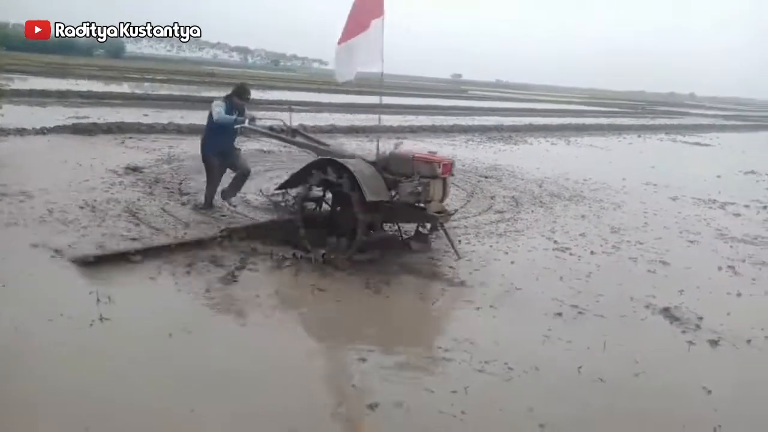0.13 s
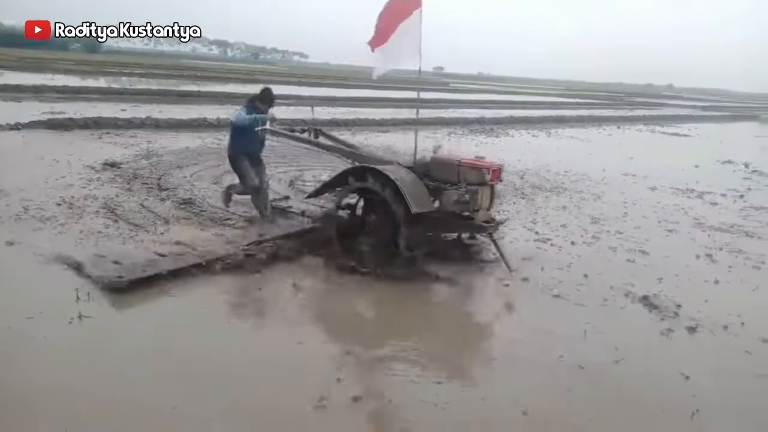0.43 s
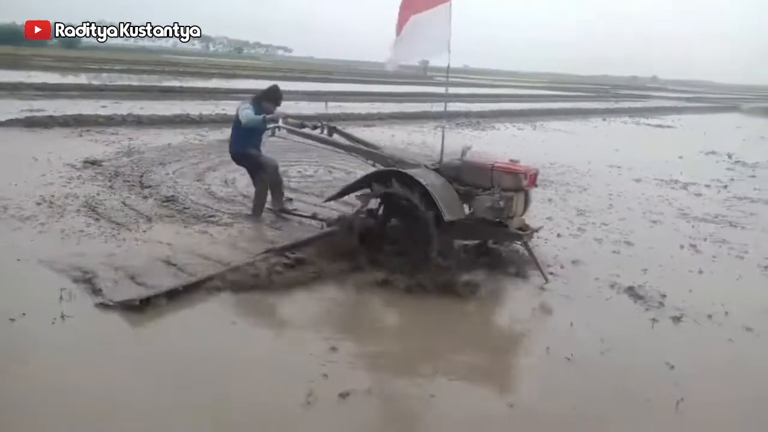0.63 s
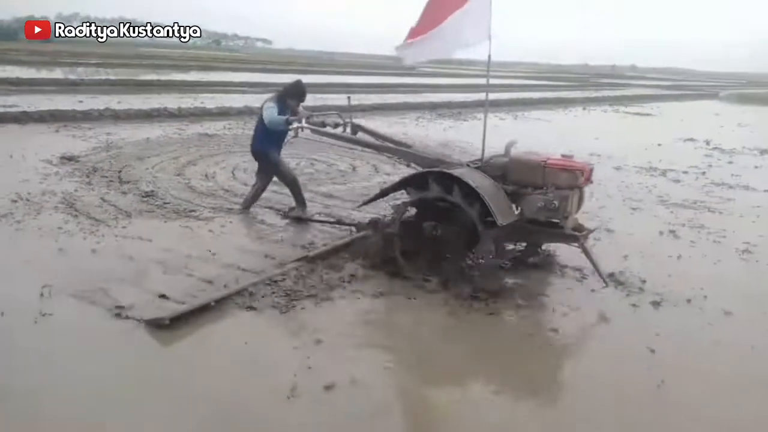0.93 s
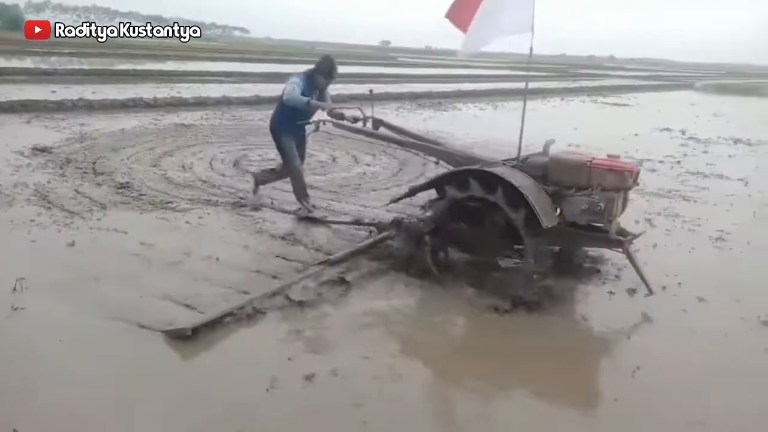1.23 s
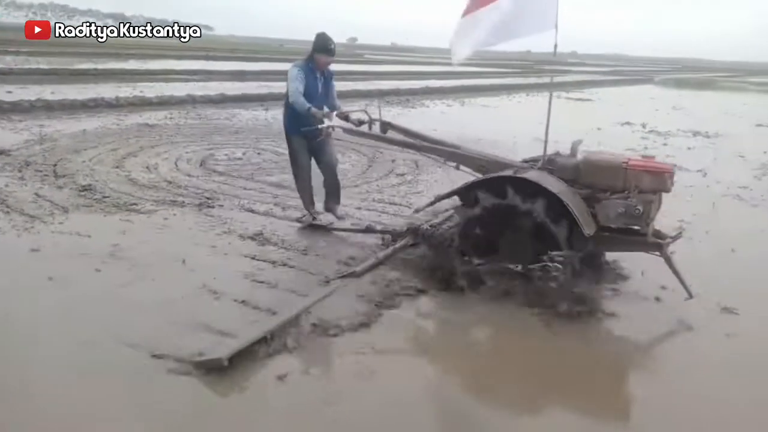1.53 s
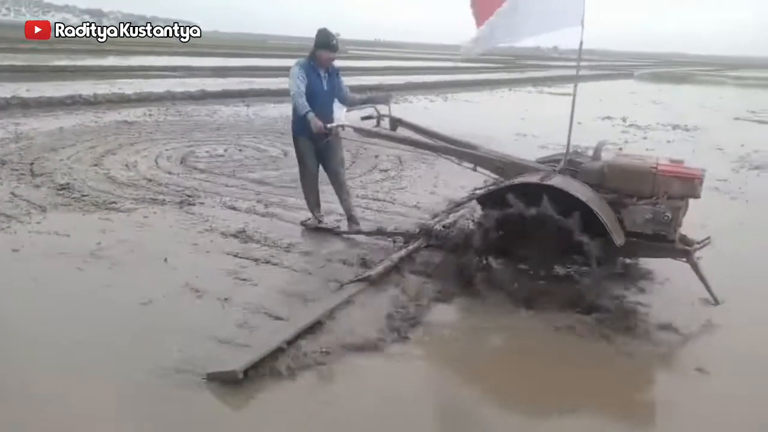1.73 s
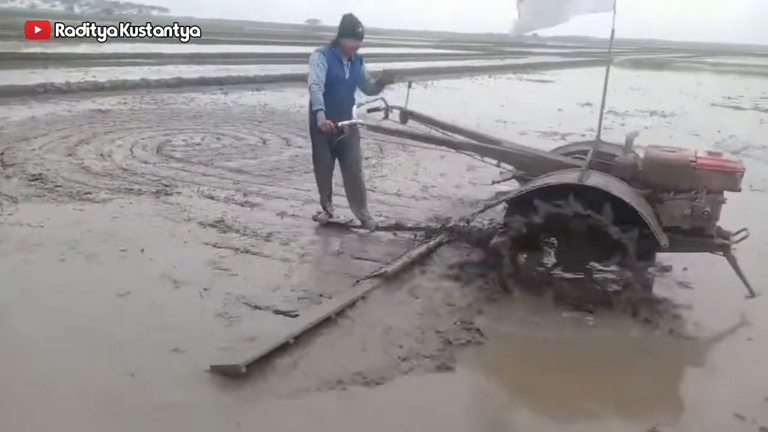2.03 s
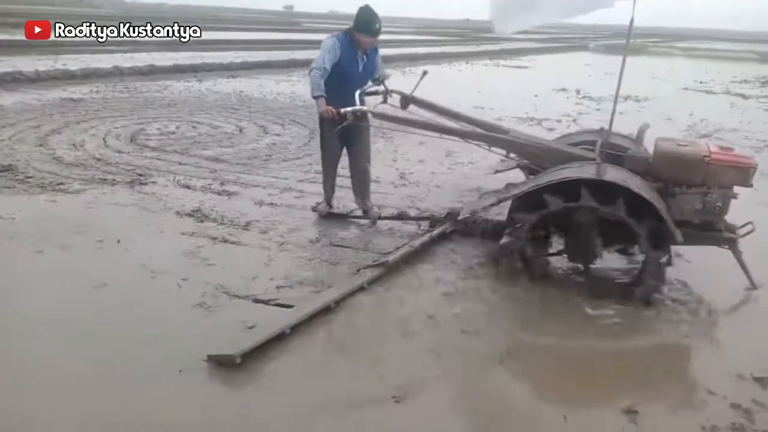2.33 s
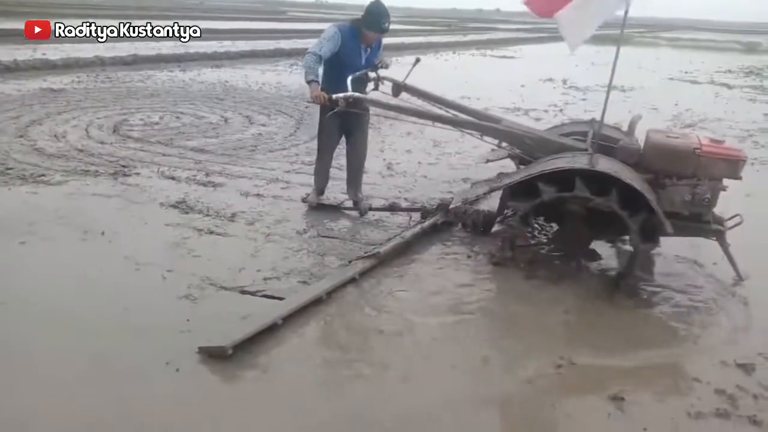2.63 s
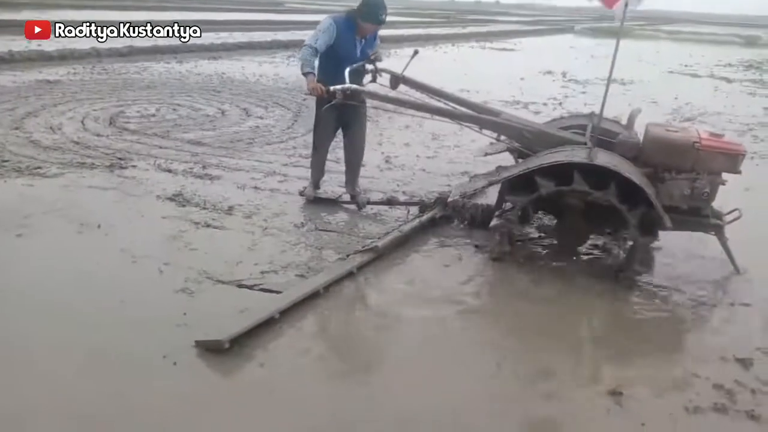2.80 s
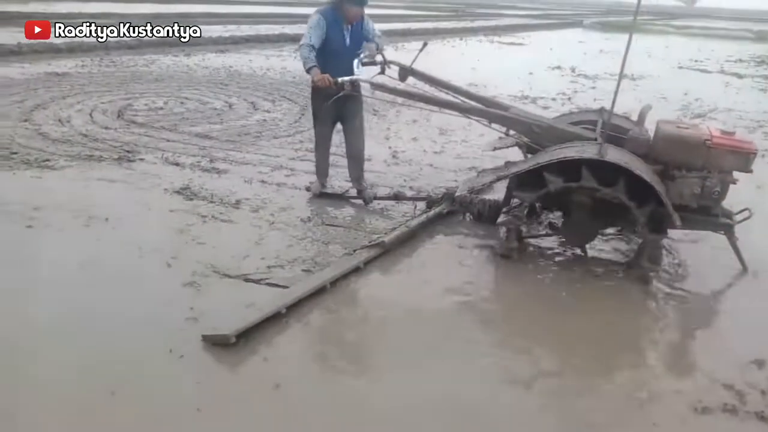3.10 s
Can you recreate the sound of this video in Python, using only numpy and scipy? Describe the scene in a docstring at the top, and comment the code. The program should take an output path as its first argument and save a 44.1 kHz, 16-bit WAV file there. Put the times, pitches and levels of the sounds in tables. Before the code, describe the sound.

A walking tractor's single-cylinder diesel rattles and slows, wheels churning wet mud and metal clanking; after a hard clank it fires in heavy knocks and chugs at idle, close in an open field, dull phone microphone.

```python
"""The single-cylinder diesel of a walking tractor coasts down with the throttle shut in a flooded field,
catches again with a few hard knocks and settles to a chugging idle. Noise bursts make the knocks and blasts;
decaying sines make the ringing intake and silencer. Gears whine (sines) and rattle (filtered clicks),
cage wheels churn the mud (denser clicks) until they die down, and the steel frame clanks (struck modes)."""
import sys
import numpy as np
from scipy import signal
from scipy.fft import rfft, irfft
from scipy.io import wavfile
from scipy.ndimage import uniform_filter1d

SR = 44100
rng = np.random.default_rng(int(sys.argv[2]) if len(sys.argv) > 2 else 0)


def store_pcm(level_fs):
    """Save levels as 16-bit WAV."""
    pcm = np.round(np.clip(level_fs, -1, 1) * 32767).astype(np.int16)
    wavfile.write(sys.argv[1], SR, np.atleast_2d(pcm).T)


N = 143766
T = np.arange(N) / SR
AGE = T[:SR // 4]  # time since the start of a short sound [s]


def undb(db):
    """Decibels to gain."""
    return 10 ** (np.asarray(db) / 20)


def curve(rows, at=T):
    """Straight lines through (time [s], value) rows."""
    return np.interp(at, *np.array(rows).T)


def unit(x):
    """Scale to rms 1."""
    return x / np.sqrt(np.mean(x ** 2))


def decay(age, t60):
    """Exponential decay that loses 60 dB in t60 seconds."""
    return np.exp(-np.log(1000) * age / t60)


def colour(x, points):
    """Causal minimum-phase filter through (frequency [Hz], level [dB]) points."""
    hz, db = np.array(points).T
    grid = np.linspace(1, SR / 2, 2049)
    cepstrum = irfft(np.log(undb(np.interp(np.log(grid), np.log(hz), db))))
    # folding the cepstrum forward in time gives minimum phase
    cepstrum[1:2048] *= 2
    cepstrum[2049:] = 0
    return signal.fftconvolve(x, irfft(np.exp(rfft(cepstrum))))[:len(x)]


def noise(points):
    """Coloured noise of rms 1."""
    return unit(colour(rng.standard_normal(N), points))


def resonate(x, modes):
    """Sum of band-pass resonances (frequency [Hz], width [Hz], level [dB])."""
    out = 0
    for hz, width, db in modes:
        out = out + undb(db) * signal.lfilter(*signal.iirpeak(hz, hz / width, SR), x)
    return out


def gas(modes, hiss_db):
    """Rushing gas: white noise passed twice through each resonance, plus some plain hiss."""
    white = rng.standard_normal(N)
    rush = 0
    for hz, width, db in modes:
        once = resonate(white, [(hz, width, db)])
        rush = rush + resonate(once, [(hz, width, 0)])
    return unit(rush) + undb(hiss_db) * white


def add(out, s, sound):
    """Mix a short sound in at a time."""
    i = int(round(s * SR))
    lo, hi = max(i, 0), min(i + len(sound), N)
    if hi > lo:
        out[lo:hi] += sound[lo - i:hi - i]


def bursts(times, db, decay_s, rise_s):
    """Envelope of bursts that rise and die away."""
    out = np.zeros(N)
    shape = (1 - np.exp(-AGE / rise_s)) * np.exp(-AGE / decay_s)
    for s, gain in zip(times, undb(db)):
        add(out, s, gain * shape)
    return out


def patter(per_s, spread_db, wash, points):
    """Dense clicks of uneven size, smeared and coloured, over a smooth wash of noise."""
    hits = rng.random(N) < per_s / SR
    signs = rng.choice([-1, 1], N)
    sizes = undb(abs(spread_db) * np.minimum(rng.exponential(size=N), 4))
    smear = rng.standard_normal(len(AGE)) * np.exp(-AGE / 0.002)
    # keep only the phase, so the smear adds no colour
    smear = irfft(np.exp(1j * np.angle(rfft(smear[:1024]))))
    clicks = signal.fftconvolve(hits * signs * sizes, smear)[:N]
    return unit(unit(colour(clicks, points)) + wash * noise(points))


# engine speed: (time [s], four-stroke cycles per second [Hz])
SPEED = [(0, 17.813), (.35, 16.08), (.8, 13.987), (1.3, 11.37), (1.7, 9.455), (1.9, 8.599), (2.1, 9.08),
         (2.4, 9.468), (2.75, 9.709), (3.26, 9.675)]
IDLE_SPEED = SPEED[-1][1]


def moments(turns, share):
    """Times at which the running engine passes a point of its cycle (0 = firing point)."""
    marks = np.arange(-1, np.ceil(turns[-1])) + share
    # extend two cycles back at the starting speed
    known_turns = np.r_[turns[0] - 2, turns]
    known_times = np.r_[-2 / SPEED[0][1], T]
    return np.interp(marks[marks < turns[-1]], known_turns, known_times)


PUFF_SCATTER_DB = 0.65


def pipe(times, db, modes, length=1, pitch=1):
    """A puff of gas rings a pipe at each time; length stretches the ring and pitch scales its tones."""
    out = np.zeros(N)
    scatter = rng.standard_normal((len(times), 2))
    puffs = np.broadcast_arrays(times, db, length, pitch)
    for s, level, stretch, scale, (size, detune) in zip(*puffs, scatter):
        ring = 0
        for hz, t60, rise, mode_db in modes:
            tone = np.sin(2 * np.pi * hz * scale * (1 + 0.003 * detune) * AGE)
            swell = (1 - np.exp(-AGE / rise)) ** 2
            ring = ring + undb(mode_db) * tone * swell * decay(AGE, t60 * stretch)
        add(out, s, undb(level + PUFF_SCATTER_DB * size) * ring)
    return out


# ringing modes of the engine block and covers: (frequency [Hz], width [Hz], level [dB])
BLOCK = [(834, 21, -8), (969, 58, -10.5), (1143, 57, 5.5), (1403, 45, 6.5), (1465, 47, 2.5), (2594, 26, 8),
         (2700, 17, -13.5), (3245, 24, 2)]
BLOCK_RING_DB = -6


def block(x):
    """Blows inside the engine also ring its block and covers."""
    return x + undb(BLOCK_RING_DB) * resonate(x, BLOCK)


# loudness of the churned mud, also followed by the loose links: (time [s], level [dB])
CHURN = [(0, -31.5), (.3, -28.5), (.7, -30.5), (1, -28), (1.3, -27.5), (1.6, -27.5), (1.87, -27.5),
         (1.98, -31), (2.35, -36), (2.6, -37), (3.26, -45)]
# colour of the splashes: (frequency [Hz], level [dB])
MUD = [(200, -28.5), (600, -2.5), (1100, -5), (1800, 9.5), (2200, 1.5), (2800, -2.5), (3800, 4.5),
       (5000, -0.5), (8000, -3.5), (15000, -1.5)]
SPLASH_PER_S, SPLASH_SPREAD_DB, MUD_WASH = 1200, 3, 0.49


def mud():
    """Cage wheels and levelling board throw up wet mud: a dense patter of splashes over a wash."""
    return undb(curve(CHURN)) * patter(SPLASH_PER_S, SPLASH_SPREAD_DB, MUD_WASH, MUD)


# steel frame modes before brightness weighting: (frequency [Hz], t60 [s], level [dB])
FRAME = [(730, 0.07, 4), (1070, 0.06, -4.5), (1850, 0.093, -3), (2330, 0.011, 7), (2277, 0.076, -5),
         (2537, 0.062, -3.5), (2938, 0.054, -1), (3436, 0.035, 0.5), (4410, 0.05, -11.5),
         (5000, 0.085, -8.5), (6620, 0.0085, 10)]
CLANK_OCTAVES = 1.3  # half-width of the bright region
CRACK_DB, CRACK_DECAY_S, CRACK_WHITE_SHARE = -3.5, 0.0074, 0.22
SNAP_DB, SNAP_DECAY_S = -6, .003


def strike(hits, ring_db):
    """Blows on metal: a snap, a crack and a short ring of the frame modes, brightest around one pitch."""
    out, age = np.zeros(N), AGE[:4096]
    grid = np.linspace(1, SR / 2, len(age) // 2 + 1)
    for s, db, bright_hz in hits:
        weight = lambda hz: 1 / (1 + (np.log2(hz / bright_hz) / CLANK_OCTAVES) ** 2)
        ring = 0
        for hz, t60, mode_db in FRAME:
            tone = np.sin(2 * np.pi * (hz * age + rng.random()))
            ring = ring + undb(mode_db) * weight(hz) * tone * decay(age, t60)
        spectrum = rfft(rng.standard_normal(len(age))) * (weight(grid) ** 2 + CRACK_WHITE_SHARE)
        crack = undb(CRACK_DB) * unit(irfft(spectrum)) * np.exp(-age / CRACK_DECAY_S)
        # bright blows get more of the white snap
        snap = rng.standard_normal(len(age)) * np.exp(-age / SNAP_DECAY_S)
        snap = undb(SNAP_DB) * weight(6000) * snap
        add(out, s, undb(db) * (snap + undb(ring_db) * ring + crack))
    return out


LINKS_PER_S, LINKS_RING_DB = 28, -21.5
LINKS_DB, LINKS_SCATTER_DB = 3, 7.5  # relative to the churned mud
LINKS_HZ, LINKS_SPREAD_OCTAVES = 2280, 1.5


def links():
    """Loose links of the hitch knock at random, their loudness following the churned mud."""
    chance = rng.random((400, 3))
    times = np.cumsum(-np.log(1 - chance[:, 0])) / LINKS_PER_S
    db = curve(CHURN, times) + LINKS_DB + LINKS_SCATTER_DB * (2 * chance[:, 1] - 1)
    bright_hz = LINKS_HZ * 2 ** (LINKS_SPREAD_OCTAVES * (2 * chance[:, 2] - 1))
    hits = np.column_stack([times, db, bright_hz])
    return strike(hits[times < T[-1]], LINKS_RING_DB)


# single knocks: first a low slap of the intake opening, then clanks of frame and hitch:
# (time [s], level [dB], brightest frequency [Hz])
KNOCKS = [(.501, -23, 910), (.936, -17, 3300), (.971, -18, 900), (.986, -15.5, 3400), (1.187, -18, 1790),
          (1.502, -16.5, 1320), (1.78, -19.5, 794), (1.9216, -14, 4200), (1.9232, -7, 2350),
          (2.27, -26, 4770), (2.327, -18, 2900)]


def single_knocks():
    """A low slap of the intake opening, then clanks of frame and hitch, all voiced by the same modes."""
    return strike(KNOCKS, ring_db=-8)


# colour of gear rattle and taps: (frequency [Hz], level [dB])
GEARS = [(40, -38), (80, -14.5), (150, 5), (300, 0.5), (400, 1.5), (520, -4), (750, 2.5), (950, 1),
         (1200, -6), (1450, -7.5), (2050, -12.5), (2600, -2), (3200, -4.5), (4200, -14), (8000, -14.5),
         (15000, -14.5)]
# loudness of the gear and chain rattle before the block's ring: (time [s], level [dB])
GEAR_LEVEL = [(0, -29.5), (.6, -28), (1.1, -26), (1.7, -27.5), (2.1, -29.5), (2.6, -31.5), (3.26, -32)]
# valve gear and piston slaps: (share of the cycle after the firing point [0-1], level before scatter [dB])
TAPS = [(0.059, -29), (0.499, -32), (.755, -32)]
# loudness of the gear whine before its waver: (time [s], level [dB])
WHINE = [(0, -30), (.5, -30), (1, -36.5), (1.4, -41.5), (1.8, -44.5), (3.26, -47)]
RATTLE_PER_S, RATTLE_SPREAD_DB, GEAR_WASH = 700, 3, 0.76
TAP_DECAY_S, TAP_RISE_S, TAP_SCATTER_DB = 0.0047, 0.0021, 2
MESH_PER_CYCLE = 46.6  # tooth contacts per engine cycle
WHINE_OCTAVE_DB, WHINE_WAVER, WAVER_S = -13, .3, .02


def gears(turns):
    """Loose rattle, taps locked to the cycle and the whine of the meshing teeth."""
    rattle = undb(curve(GEAR_LEVEL)) * patter(RATTLE_PER_S, RATTLE_SPREAD_DB, GEAR_WASH, GEARS)
    taps = np.zeros(N)
    for share, db in TAPS:
        times = moments(turns, share)
        levels = db + TAP_SCATTER_DB * rng.standard_normal(len(times))
        taps += noise(GEARS) * bursts(times, levels, TAP_DECAY_S, TAP_RISE_S)
    mesh = 2 * np.pi * MESH_PER_CYCLE * turns
    whine = np.sin(mesh) + undb(WHINE_OCTAVE_DB) * np.sin(2 * mesh)
    drift = unit(uniform_filter1d(rng.standard_normal(N), int(WAVER_S * SR)))
    waver = 1 + WHINE_WAVER * drift
    return block(rattle + taps) + waver * undb(curve(WHINE)) * whine


# strength of the air drawn in, which also scales the valve rushes: (time [s], level [dB])
DRAW = [(0, -1.5), (.3, 1.5), (.8, -1.5), (1.1, 1.5), (1.45, -4), (1.9, -6.5), (2.35, -2.5), (3.26, -2)]
# gas rushing past the valves, width for each of two passes:
# (share of the cycle [0-1], level [dB], decay [s], rise [s], frequency [Hz], width [Hz])
RUSHES = [(0.417, -24, .013, .007, 1480, 1100), (.505, -17.5, 0.0037, 0.0023, 830, 370),
          (0.38, -28.5, 0.0071, 0.0045, 4200, 600)]
GAS_HISS_DB = -28.5  # plain hiss in the valve rushes and exhaust blasts


def valves(turns):
    """Gas rushes past the valves late in the exhaust stroke and as the intake is about to open."""
    out = np.zeros(N)
    for share, db, decay_s, rise_s, hz, width in RUSHES:
        times = moments(turns, share)
        rush = gas([(hz, width, 0)], GAS_HISS_DB)
        out += rush * bursts(times, db + curve(DRAW, times), decay_s, rise_s)
    return out


# gulp as the intake opens: (frequency at idle [Hz], t60 [s], rise [s], level [dB])
INTAKE_GULP = [(263.4, 0.03, 0.00072, -9)]
# fixed tones as the intake opens: (frequency [Hz], t60 [s], rise [s], level [dB])
INTAKE_OPEN = [(178, 0.057, 0.001, -17.5), (299.3, .2, .004, -26), (382, 0.017, 0.00012, -21)]
# hollow ring once the intake shuts: (frequency [Hz], t60 at idle [s], rise [s], level at idle [dB])
INTAKE_SHUT = [(154.7, 0.1, 0.0022, -12), (307.3, 0.28, 0.0012, -29)]
INTAKE_OPENS, INTAKE_SHUTS = .53, .752  # share of the cycle after the firing point
GULP_DROP_POWER, SHUT_RING_POWER = 0.22, 0.46  # powers of engine speed
SHUT_DROP_DB = 5.5  # softer start per doubling of the ring's length
INTAKE_LOW_HZ = 82


def intake(turns):
    """A gulp as the valve opens, deeper at speed; a ring once it shuts, longer at speed; little bass."""
    opens, shuts = moments(turns, INTAKE_OPENS), moments(turns, INTAKE_SHUTS)
    draw = curve(DRAW, opens)
    pitch = (IDLE_SPEED / curve(SPEED, opens)) ** GULP_DROP_POWER
    gulp = pipe(opens, draw, INTAKE_GULP, pitch=pitch) + pipe(opens, draw, INTAKE_OPEN)
    length = (curve(SPEED, shuts) / IDLE_SPEED) ** SHUT_RING_POWER
    ring_db = curve(DRAW, shuts) - SHUT_DROP_DB * np.log2(length)
    ring = pipe(shuts, ring_db, INTAKE_SHUT, length)
    # the small mouth radiates little bass
    bass_cut = signal.butter(2, INTAKE_LOW_HZ, "high", fs=SR, output="sos")
    return signal.sosfilt(bass_cut, gulp - ring)


# force of combustion, swinging as the governor hunts before it settles: (time [s], level [dB])
FUEL = [(1.7, -12), (1.88, -3.5), (1.99, -2.5), (2.1, -4.5), (2.21, -0.5), (2.32, -10), (2.43, -1.5),
        (2.54, -4), (3.26, -7)]
# loudness of the silencer's thump: (time [s], level [dB])
THUMP = [(1.7, -10.5), (1.9, -6), (2.03, -1), (2.4, -1.5), (3.26, -2.5)]
# silencer mode of a thump: (frequency up to idle force [Hz], t60 [s], rise [s], level [dB])
SILENCER = [(115.7, 0.045, 0.0081, 3.5)]
# silencer mode of a suck: (frequency [Hz], t60 [s], rise [s], level [dB])
SILENCER_SUCK = [(117.4, 0.051, 0.0032, -13)]
# sharp exhaust barks among the hard firings: (time [s], level [dB], hiss relative to the bark [dB])
BARKS = [(2.019, -9, -0.5), (2.238, -13, 0), (2.45, -17.5, -22)]
# resonances of a bark: (frequency [Hz], width for each of two passes [Hz], level [dB])
BARK = [(1470, 700, 0), (3400, 1400, 1.5), (4080, 440, 0.5), (6200, 1000, 2.5)]
BARK_DECAY_S, BARK_RISE_S = 0.0053, 0.004
EXHAUST_OPENS = .255  # share of the cycle after the firing point
THUMP_FROM_S = 1.65  # from here the exhaust puffs thump instead of suck
IDLE_FUEL_DB, THUMP_RISE_OCTAVES_PER_DB = -5, 0.05


def silencer(turns):
    """Exhaust puffs first suck at the silencer, later thump it, higher when strong; barks at set times."""
    opens = moments(turns, EXHAUST_OPENS)
    sucking, thumping = opens[opens < THUMP_FROM_S], opens[opens >= THUMP_FROM_S]
    # look back to the force at the firing point of the same cycle
    fuel = curve(FUEL, thumping - EXHAUST_OPENS / curve(SPEED, thumping))
    pitch = 2 ** (THUMP_RISE_OCTAVES_PER_DB * np.maximum(fuel - IDLE_FUEL_DB, 0))
    thump = pipe(thumping, curve(THUMP, thumping), SILENCER, pitch=pitch)
    suck = pipe(sucking, 0, SILENCER_SUCK)  # opposite in sign to the thump
    barks = np.zeros(N)
    for s, db, hiss_db in BARKS:
        barks += gas(BARK, hiss_db) * bursts([s], [db], BARK_DECAY_S, BARK_RISE_S)
    return thump - suck + barks


# colour of the knock before the block's ring: (frequency [Hz], level [dB])
KNOCK = [(200, -10.5), (500, -8), (750, 0), (1000, 3), (1200, -6), (1450, -1), (2050, -9), (2500, -6.5),
         (3100, -3.5), (4000, -9), (8000, -20), (15000, -19.5)]
# resonances of the exhaust blast: (frequency [Hz], width for each of two passes [Hz], level [dB])
BLAST = [(1440, 340, 9.5), (2730, 220, 4), (4240, 390, -1.5)]
KNOCK_DB, KNOCK_DECAY_S, KNOCK_RISE_S = -16, .016, .0005
BLAST_DB, BLAST_DECAY_S, BLAST_RISE_S = -14, 0.0066, 0.0053
KNOCK_FUEL_POWER, BLAST_FUEL_POWER = 1.76, 1  # dB of sound per dB of combustion force
BLAST_TURN = 0.227  # share of the cycle from the firing point to the blast


def combustion(turns):
    """Every cycle knocks the block and chuffs at the exhaust, faintly while coasting, harder when firing."""
    tops = moments(turns, 0)
    fuel, period = curve(FUEL, tops), 1 / curve(SPEED, tops)
    blows = bursts(tops, KNOCK_DB + KNOCK_FUEL_POWER * fuel, KNOCK_DECAY_S, KNOCK_RISE_S)
    knock = block(noise(KNOCK) * blows)
    blast_db = BLAST_DB + BLAST_FUEL_POWER * fuel
    puffs = bursts(tops + BLAST_TURN * period, blast_db, BLAST_DECAY_S, BLAST_RISE_S)
    return knock + gas(BLAST, GAS_HISS_DB) * puffs


START_TURN = .194  # share of the cycle already run at the start


def scene():
    """The tractor in the open field, with no echo."""
    turns = START_TURN + np.cumsum(curve(SPEED)) / SR  # engine cycles so far
    background = mud() + links() + single_knocks()
    engine = gears(turns) + valves(turns) + intake(turns) + silencer(turns) + combustion(turns)
    return (background + engine)[None]


# microphone colour: (frequency [Hz], level [dB])
MIC = [(25, -16), (60, 2.5), (4100, -0.5), (5000, -8), (6000, -13), (7400, -14), (8500, -29.5),
       (10500, -43), (12000, -37), (13200, -29), (15400, -35)]
TOP_HZ = 15500


def record(dry):
    """A phone microphone, dull above 4 kHz, with a steep top cut."""
    top_cut = signal.ellip(8, .2, 70, TOP_HZ, fs=SR, output="sos")
    return signal.sosfilt(top_cut, colour(dry[0], MIC))[None]


dry = scene()
out = record(dry)
store_pcm(out)
```